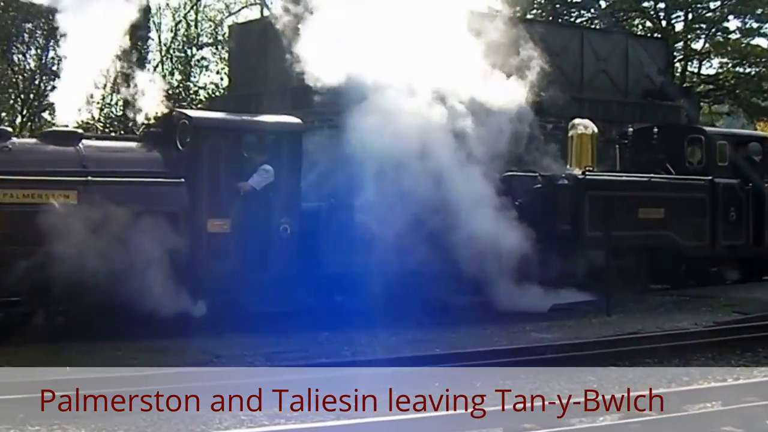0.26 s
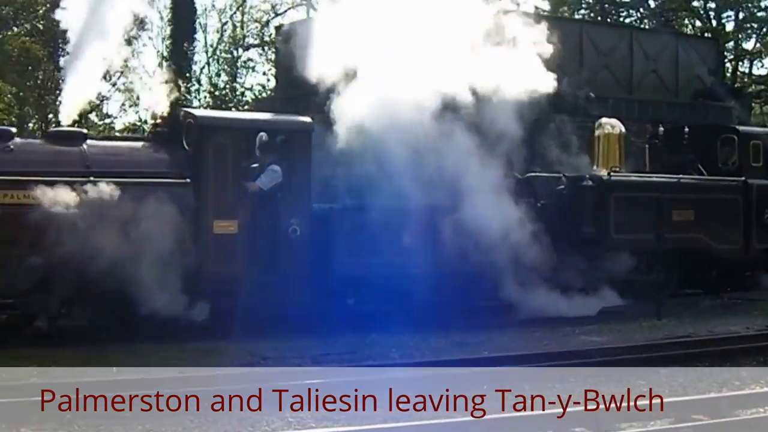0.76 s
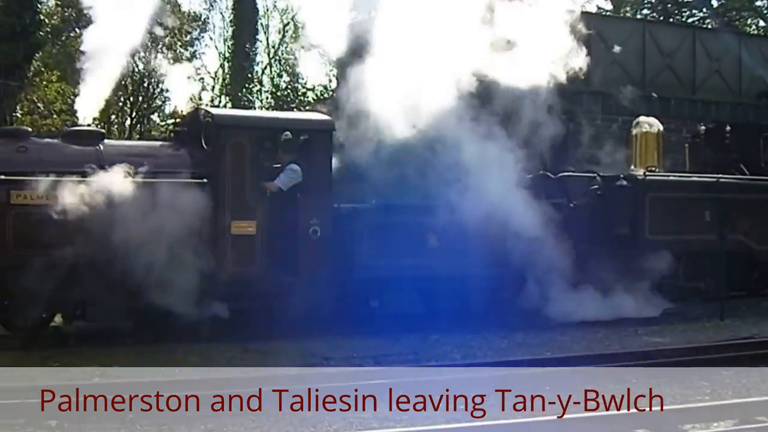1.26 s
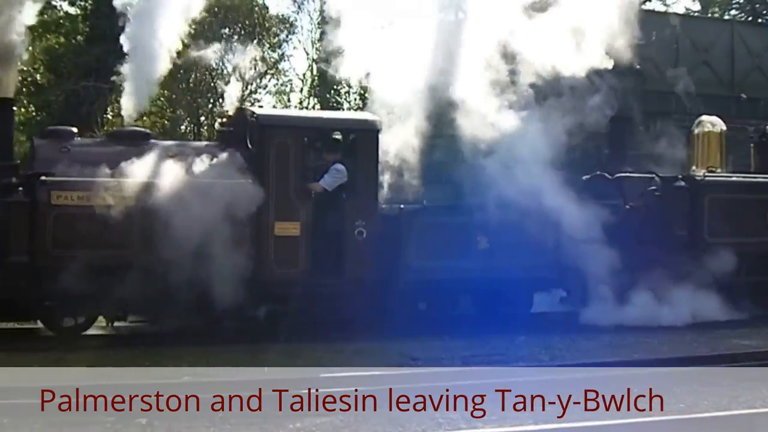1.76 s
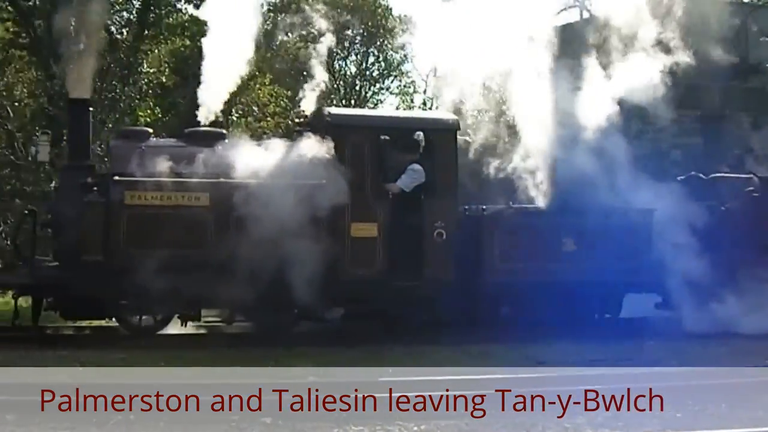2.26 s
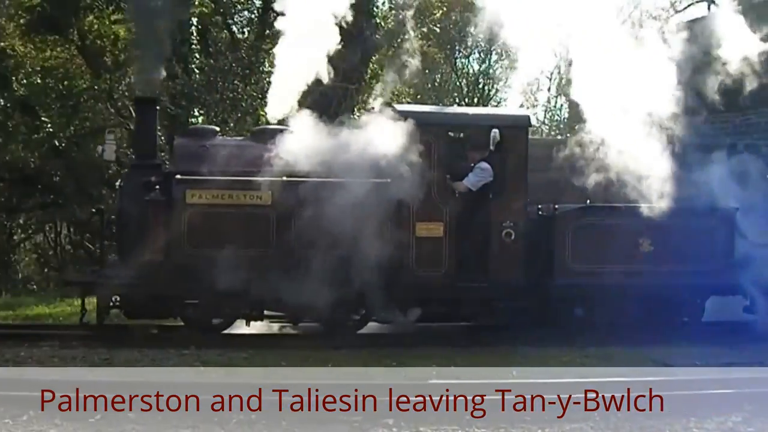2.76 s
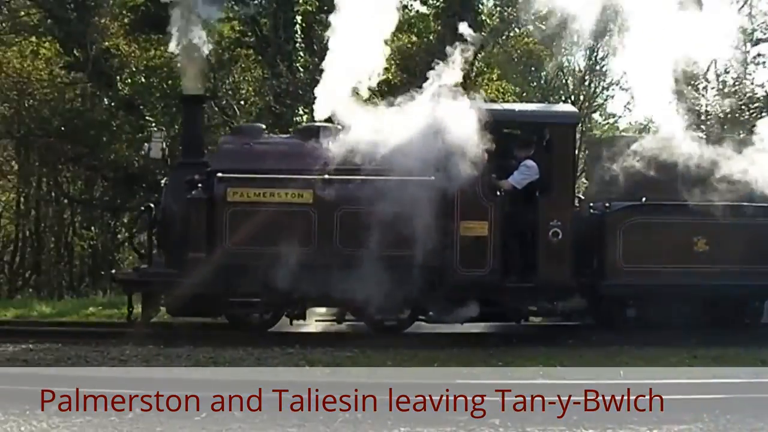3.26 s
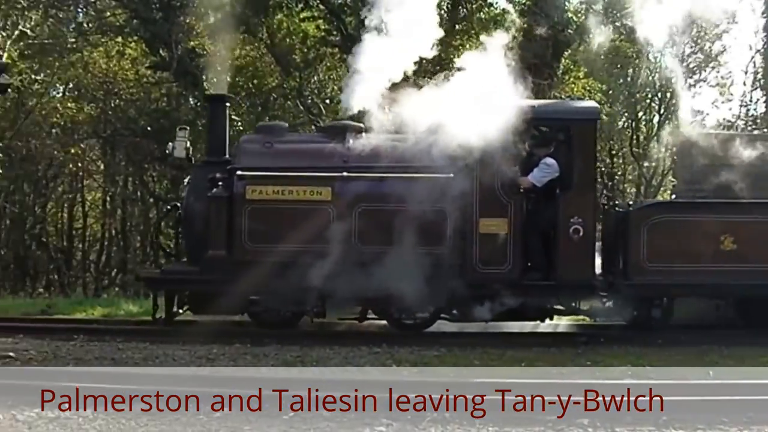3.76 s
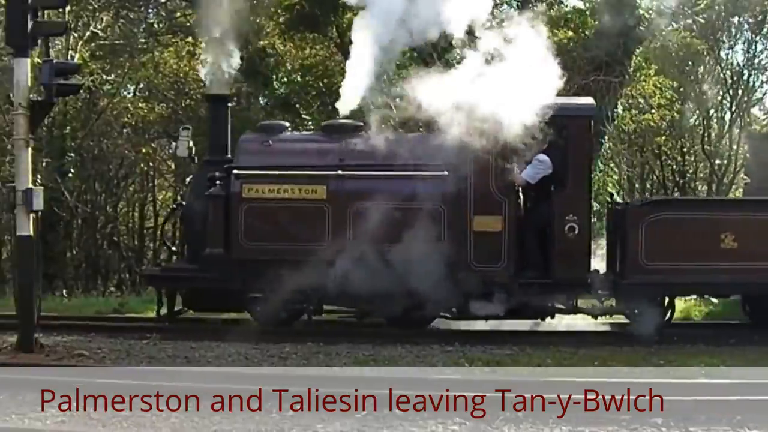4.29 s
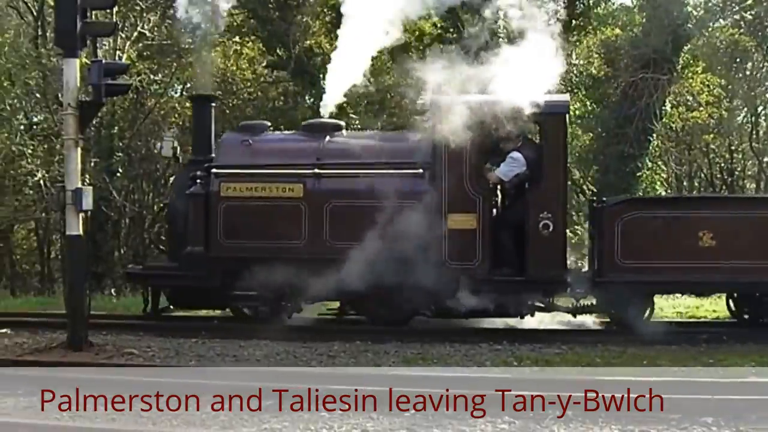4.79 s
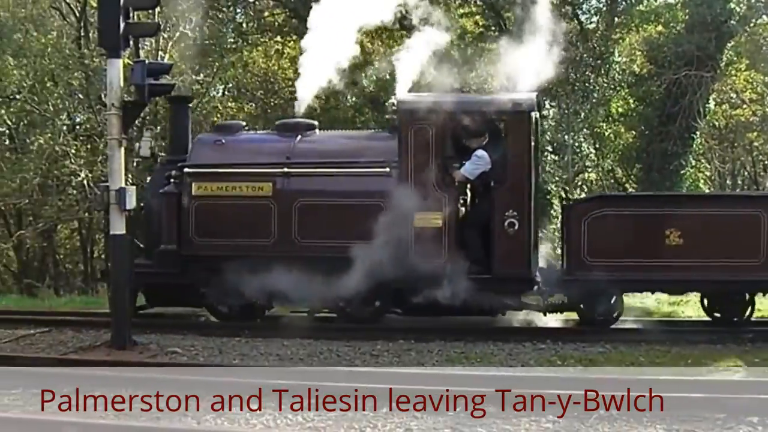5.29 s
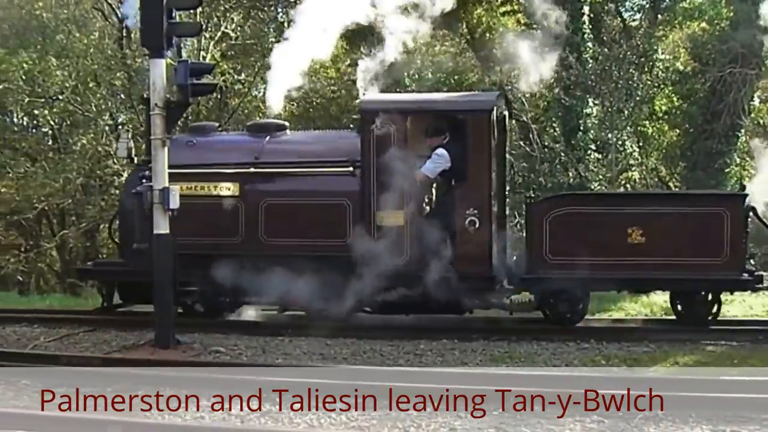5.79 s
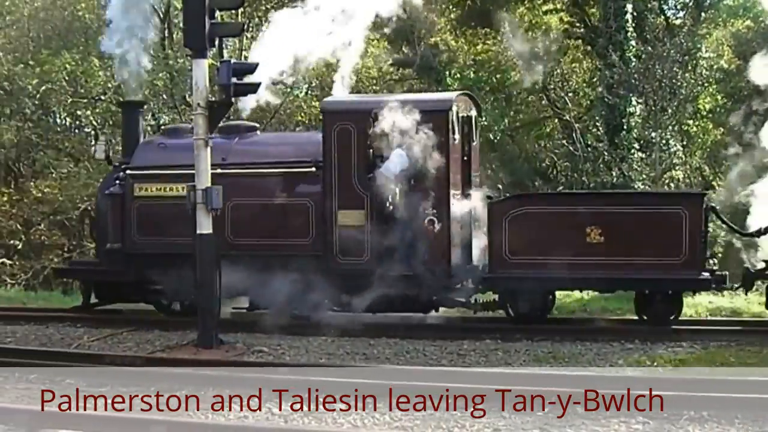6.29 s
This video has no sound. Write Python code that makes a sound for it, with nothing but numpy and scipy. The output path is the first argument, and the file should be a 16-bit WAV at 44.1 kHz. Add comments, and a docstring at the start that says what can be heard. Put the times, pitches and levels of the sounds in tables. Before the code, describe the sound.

Two steam locomotives start a train in open air, heard close from the trackside. Steam hiss dominates throughout, a wet rush mixed with a dry, bright edge. It swells at about 0.7 seconds and is loudest from 1.2 to 2.1 seconds. Beneath it, a few hollow chuffs turn into a quick, raspy flurry of wheel slip between 1.3 and 2.2 seconds. The sound then drops, with several tiny squirts of water around 2.3 to 2.7 seconds and others scattered throughout. From 3 seconds the hiss returns in softer, repeated gusts, while the chuffs of both engines, about three a second and often doubled, gradually strengthen. A thin, very high jet sizzles from 5 seconds and cuts off at 5.5. Light metallic knocks come at about 0.5, 3.4 and 6.1 seconds. A faint, low wheel rumble grows toward the end at 6.5 seconds.

```python
"""Steam hisses from the open cylinder cocks of two narrow-gauge locomotives starting a train:
rear engine first, then the leading one. Each blow is a wet rush plus a dry hiss, combed by short
echoes; slugs of condensed water spit, and a thin jet sings once. Exhaust beats of both engines
ring the chimneys, with one quick flurry of wheel slip. Rods knock over a low wheel rumble."""
import sys
import numpy as np
from scipy import signal
from scipy.fft import rfft, irfft
from scipy.io import wavfile
from scipy.ndimage import uniform_filter1d, map_coordinates

SR = 44100
rng = np.random.default_rng(int(sys.argv[2]) if len(sys.argv) > 2 else 0)


def wav_record(signal):
    """Record a signal, one row per channel, as 16-bit PCM in the file named by sys.argv[1]."""
    frames = np.transpose(np.atleast_2d(signal))
    bounded = np.clip(frames, -1, 1)
    # unit amplitude maps onto the largest positive 16-bit level
    quanta = np.round(bounded * 32767).astype(np.int16)
    wavfile.write(sys.argv[1], SR, quanta)


N = 288414

# chimney draught and rolling train: t/s, draught level/dB, rumble level/dB
BED_LEVELS = [(0, -40.5, -55.5), (1.1, -40.5, -54.5), (1.3, -46, -55.5), (2, -46, -48.5), (2.3, -52.5, -63),
              (3.2, -50.5, -60.5), (4.6, -53.5, -53), (5.5, -52.5, -50), (6.5, -53.5, -45.5)]
# wheels on rails: f/Hz, level/dB
RUMBLE_SPECTRUM = [(15, -25), (45, -9), (90, 3), (130, -3), (220, -6), (300, -15), (600, -15),
                   (1300, -15.5), (4000, -45)]
# knocks of rods and couplings: t/s, level/dB
ROD_KNOCKS = [(0.528, -27.5), (3.384, -36), (6.13, -30)]
# ringing steel: f/Hz, level/dB, t60/s
STEEL_MODES = [(1830, -0.5, 0.13), (1900, -3.5, 0.11), (2040, -5, 0.099), (2800, -9, .07), (3460, -11, .05)]
# exhaust beats of both engines, in and out of step: t/s, level/dB
EXHAUST_BEATS = [(0.025, -38.5), (0.355, -32.5), (0.834, -32), (1.078, -37.5), (1.288, -29), (1.441, -29),
                 (1.569, -29), (1.676, -29.5), (1.788, -30.5), (1.892, -30), (2.02, -35.5), (2.163, -37),
                 (2.335, -44.5), (2.39, -43.5), (2.831, -42), (2.892, -40), (3.251, -38.5), (3.39, -38),
                 (3.603, -36.5), (3.895, -38.5), (4.008, -36), (4.331, -34), (4.372, -33), (4.72, -34.5),
                 (4.79, -34), (5.039, -34.5), (5.195, -35.5), (5.397, -35), (5.628, -33.5), (5.718, -30),
                 (6.001, -31.5), (6.04, -32.5), (6.305, -32), (6.384, -31)]
# chimney resonances, and the rear one under its blower: f/Hz, width/Hz, level/dB
REAR_CHIMNEY_MODES = [(159, 61, -6.5), (405, 51, 1), (665, 62, 1), (1034, 26, -3)]
LEAD_CHIMNEY_MODES = [(178, 102, -7), (405, 47, 2), (671, 140, -2.5), (1030, 160, -9), (1200, 50, -10)]
BLOWER_MODES = [(170, 79, -10), (414, 60, -0.5), (662, 125, 0), (1680, 200, -2)]
# blast pipe turbulence: f/Hz, level/dB
RASP_SPECTRUM = [(60, -13), (250, -9), (400, -24), (750, -2.5), (900, -6), (1150, -1.5), (1380, -5.5),
                 (1600, 3), (2300, 0.5), (3500, -3.5), (6000, -9.5), (14000, -32)]
# water spat from the cocks: t/s, length/s, f/Hz, level/dB
WATER_SLUGS = [(.175, .05, 3100, -33), (1.06, .09, 4600, -33), (2.308, .035, 4100, -30),
               (2.382, .043, 4250, -30), (2.487, .035, 3850, -35), (2.55, .03, 3950, -36),
               (2.7, .06, 6300, -35), (3.71, .08, 4800, -34), (4.36, .08, 3800, -36),
               (4.59, .06, 2850, -33), (5.485, .055, 4620, -31), (6.01, .03, 3000, -29),
               (6.265, .07, 3200, -30.5)]
# a cock blows while its cylinder end holds steam: t/s, length/s, rush level/dB, hiss level/dB
COCK_BLOWS = [(-0.05, .72, -29.5, -32), (0.02, 0.047, -41.5, -31), (0.385, .06, -46, -31.5),
              (0.663, 0.51, -24.5, -26.5), (1.169, 0.44, -27.5, -19.3), (1.604, .51, -26, -21.5),
              (2.137, 0.075, -32.5, -36), (2.29, .12, -35.5, -39), (2.45, 0.46, -38, -46.5),
              (2.683, 0.07, -31.5, -43), (3.09, 0.74, -35, -37), (3.57, .24, -32.5, -38),
              (3.852, 0.46, -35.5, -41), (4.024, .23, -33.5, -44), (4.313, 0.17, -33.5, -38.5),
              (4.512, .33, -33.5, -38), (4.923, 0.6, -30.5, -34), (5.372, .15, -30, -36),
              (5.57, .87, -31, -36.5), (5.974, 0.38, -33, -38.5), (6.499, .06, -28.5, -32)]
# wet rush of each engine, dry high-pressure hiss of both: f/Hz, level/dB
REAR_RUSH_SPECTRUM = [(300, -49), (1150, -20.5), (1450, -13.5), (1700, -11), (2200, -10), (2700, -7.5),
                      (3600, -10), (4600, -3.5), (5200, -3), (6200, 3.5), (7200, -2), (8700, -2),
                      (9800, -15), (16000, -10)]
LEAD_RUSH_SPECTRUM = [(300, -63), (1400, -19), (1700, -11.5), (2300, -8.5), (2650, -2.5), (3100, -4.5),
                      (3400, -5.5), (5000, -2.5), (6150, 5.5), (7200, 0.5), (8600, 3), (9600, -5),
                      (16000, -29)]
HISS_SPECTRUM = [(500, -62), (2000, -23), (5000, -6), (8500, 1), (9600, 0.5), (11200, 2), (12000, 1.5),
                 (12700, 1.5), (15600, -3.5), (17000, -40)]
# jets lie nearer the right, which takes more treble: f/Hz, left minus right/dB
JET_TILT = [(1000, 3.5), (2300, -1.5), (3300, 4.5), (4500, 2), (6000, -3), (7200, -4.5), (9000, -3),
            (11500, -8), (15000, -3.5)]
# jets swing as the engines pass: t/s, left minus right/dB
JET_PAN = [(.45, 2.3), (.8, 0), (3.5, -0.5), (5.3, 0.7)]
# echoes off ground, frames and tank side: delay/ms, drift/ms, relative level/dB
JET_PATHS = [(1.08, 0.039, -4), (2.8, .2, 3), (6, 0.099, 1)]

HANDOVER_S = 2.25  # the leading engine becomes the nearer one
SLIP_START_S, SLIP_END_S = 1.25, 2.2
BEAT_OPEN_S, SLIP_OPEN_S, SLIP_RASP_DB = 0.061, 0.05, 3
COCK_RISE_S, COCK_FALL_S = 0.036, 0.038
LEAK_RUSH_DB, LEAK_HISS_DB, SURGE_DB = -35.5, -41.5, 0.9
NOTCH_HZ, LOWPASS_HZ = 7900, 15650


def undb(db):
    """Decibels to gain."""
    return 10 ** (np.asarray(db) / 20)


def unit(x):
    """Scale to rms 1 at the stereo centre."""
    return x / np.sqrt(np.mean(np.atleast_2d(x).mean(axis=0) ** 2))


def times():
    """Sample times in s."""
    return np.arange(N) / SR


def freqs():
    """Bin frequencies in Hz, floored at 1."""
    return np.maximum(np.arange(N // 2 + 1) * SR / N, 1)


def curves(table):
    """Table columns, linearly interpolated in time."""
    t_s, *columns = np.transpose(table)
    return [np.interp(times(), t_s, column) for column in columns]


def colour(spectrum):
    """Gain per bin from f/Hz, level/dB points."""
    hz, db = np.transpose(spectrum)
    return undb(np.interp(np.log(freqs()), np.log(hz), db))


def resonance(hz, width_hz):
    """One resonance, gain 1 at its centre."""
    f = freqs()
    return 1 / (1 + 1j * (f * f - hz * hz) / (f * width_hz))


def walk(rate_hz):
    """Random steps, smoothed twice; rms 1."""
    hold = max(int(SR / rate_hz), 1)
    steps = rng.standard_normal(N)[np.arange(N) // hold]
    return unit(uniform_filter1d(uniform_filter1d(steps, hold), hold))


def puff(start_s, length_s, rise_s, fall_s):
    """Valve envelope: pressure builds, holds, drains."""
    age_s = times() - start_s
    return np.clip(age_s / rise_s, 0, 1) * np.exp(-np.maximum(age_s - length_s, 0) / fall_s)


def turbulence(response, diffuse_db, left_gain=1, lag_us=0):
    """Coloured stereo noise: a direct wave, lagging on the left, plus scattered sound."""
    direct, *scattered = rfft(rng.standard_normal((3, N)))
    delay = np.exp(-2j * np.pi * freqs() * lag_us / 10 ** 6)
    channels = np.array([left_gain * delay, np.ones_like(delay)])
    field = direct + undb(diffuse_db) * np.array(scattered)
    return unit(irfft(response * channels * field, N))


def eddies(x, depth_db, width_hz, life_s, fft_size):
    """Passing eddies favour one narrow band, then another."""
    hz, t_s, spectrum = signal.stft(x, SR, nperseg=fft_size)
    cells = np.meshgrid(hz / width_hz, t_s / life_s, indexing="ij")
    swell = map_coordinates(rng.standard_normal((400, 400)), cells, order=1, mode="wrap")
    _, swirled = signal.istft(spectrum * undb(depth_db * swell), SR)
    return unit(swirled[:, :N])


def reflected(x, paths):
    """Add echoes (delay/ms, level/dB); drifting delays make a sliding comb."""
    t = times()
    echoes = sum(undb(db) * np.array([np.interp(t - ms / 1000, t, side) for side in x])
                 for ms, db in paths)
    return unit(x + echoes)


def wheels():
    """Uneven rumble of wheels on rails."""
    _, rumble_db = curves(BED_LEVELS)
    uneven_db = 1.5 * walk(rate_hz=12)
    rumble = turbulence(colour(RUMBLE_SPECTRUM), diffuse_db=-10, left_gain=undb(1.5))
    return rumble * undb(rumble_db + uneven_db)


def knocks():
    """Slack in the running gear closes; the steel rings briefly."""
    out = np.zeros(N)
    for start_s, db in ROD_KNOCKS:
        age_s = np.maximum(times() - start_s, 0)
        for hz, mode_db, t60_s in STEEL_MODES:
            decay = np.exp(-np.log(1000) * age_s / t60_s)
            out += undb(db + mode_db - 2.5) * np.sin(2 * np.pi * hz * age_s) * decay
    return out


def chimney(modes):
    """Blast noise rings a chimney; the open pipe radiates little deep bass."""
    power = sum(abs(undb(db) * resonance(hz, width_hz)) ** 2 for hz, width_hz, db in modes)
    radiation = abs(resonance(hz=330, width_hz=1850))
    pipe = turbulence(np.sqrt(power) * radiation, diffuse_db=-13.5, left_gain=undb(2.5))
    return eddies(pipe, depth_db=2.5, width_hz=112.2, life_s=0.12, fft_size=1024)


def beat_envelopes():
    """Chimney tone and rasp per valve opening; shorter and raspier during wheel slip."""
    tone_power, rasp_power = np.zeros((2, N))
    for start_s, db in EXHAUST_BEATS:
        slipping = SLIP_START_S < start_s < SLIP_END_S
        open_s, rasp_db = (SLIP_OPEN_S, SLIP_RASP_DB) if slipping else (BEAT_OPEN_S, 0)
        tone_power += (undb(db) * puff(start_s, open_s, rise_s=0.036, fall_s=0.031)) ** 2
        rasp_power += (undb(db + rasp_db) * puff(start_s, open_s, rise_s=0.026, fall_s=0.033)) ** 2
    return np.sqrt(tone_power), np.sqrt(rasp_power)


def exhaust():
    """Puffs of chimney tone and blast pipe rasp over a weak draught."""
    tone_env, rasp_env = beat_envelopes()
    draught_db, _ = curves(BED_LEVELS)
    rear_nearer = times() < HANDOVER_S
    tone = np.where(rear_nearer, chimney(REAR_CHIMNEY_MODES), chimney(LEAD_CHIMNEY_MODES))
    draught = np.where(rear_nearer, chimney(BLOWER_MODES), tone)
    rasp = turbulence(colour(RASP_SPECTRUM), diffuse_db=-19, left_gain=undb(2))
    rasp = eddies(rasp, depth_db=4.5, width_hz=121.3, life_s=0.15, fft_size=1024)
    blast = undb(-0.9) * tone_env * tone + undb(-0.83) * rasp_env * rasp
    return blast * undb(0.63 * walk(rate_hz=130)) + undb(draught_db) * draught


def spits():
    """Water narrows a jet to a brief, semi-tonal squirt that rises as the slug clears."""
    out = np.zeros((2, N))
    flutter = turbulence(resonance(hz=130, width_hz=300) ** 2, diffuse_db=-7, left_gain=undb(2))
    lag_rad = np.array([[1.2], [0]])
    for start_s, length_s, hz, db in WATER_SLUGS:
        progress = (times() - start_s) / length_s
        pitch_hz = hz * (1 + 0.035 * np.clip(progress - 0.7, -1, 1))
        phase_rad = 2 * np.pi * np.cumsum(pitch_hz) / SR - lag_rad
        envelope = undb(db) * puff(start_s, length_s, rise_s=0.016, fall_s=0.012)
        out += envelope * flutter * np.sqrt(2) * np.sin(phase_rad)
    return out


def thin_jet():
    """Steam sings through a narrow gap and stops dead as the valve covers it."""
    band = resonance(hz=11000, width_hz=2500) ** 2
    sizzle = turbulence(band, diffuse_db=-1, left_gain=undb(-15), lag_us=50)
    opening = puff(start_s=4.95, length_s=0.59, rise_s=0.1, fall_s=0.008)
    return undb(-33.5) * opening * sizzle


def cock_envelopes():
    """Rush and hiss: blows add to a steady leak; the hiss surges on each exhaust beat."""
    rush_power, hiss_power = undb(LEAK_RUSH_DB) ** 2, undb(LEAK_HISS_DB) ** 2
    for start_s, length_s, rush_db, hiss_db in COCK_BLOWS:
        opening = puff(start_s, length_s, COCK_RISE_S, COCK_FALL_S)
        rush_power += (undb(rush_db) * opening) ** 2
        hiss_power += (undb(hiss_db) * opening) ** 2
    beats = [puff(start_s, BEAT_OPEN_S, COCK_RISE_S, COCK_FALL_S) for start_s, _ in EXHAUST_BEATS]
    surge = undb(SURGE_DB * np.max(beats, axis=0))
    return np.sqrt(rush_power), np.sqrt(hiss_power) * surge


def jet(envelopes, rush_spectrum, rush_lag_us, hiss_lag_us, rush_db, hiss_db, diffuse_db, echo_db):
    """One engine's cock steam: wet rush and dry hiss, mirrored by ground and moving steel."""
    rush_env, hiss_env = envelopes
    left_gain = colour(JET_TILT)
    paths = [(ms + drift_ms * walk(rate_hz=0.99), echo_db + db) for ms, drift_ms, db in JET_PATHS]
    rush = turbulence(colour(rush_spectrum), diffuse_db, left_gain, rush_lag_us)
    rush = eddies(reflected(rush, paths), depth_db=2.4, width_hz=240, life_s=0.07, fft_size=512)
    hiss = turbulence(colour(HISS_SPECTRUM), diffuse_db=-3.3, left_gain=left_gain, lag_us=hiss_lag_us)
    hiss = hiss_env * reflected(hiss, paths) * undb(hiss_db)
    # droplets break the jet: flutter
    rush *= rush_env * undb(rush_db + 0.61 * walk(rate_hz=60))
    return (rush + hiss) * undb(0.71 * walk(rate_hz=500))


def cocks():
    """Open cylinder cocks: equal-power fade from the rear engine to the leading one."""
    envelopes = cock_envelopes()
    rear = jet(envelopes, REAR_RUSH_SPECTRUM, rush_lag_us=29.3, hiss_lag_us=5.8,
               rush_db=-0.37, hiss_db=0.75, diffuse_db=-6, echo_db=-21)
    lead = jet(envelopes, LEAD_RUSH_SPECTRUM, rush_lag_us=45.8, hiss_lag_us=55.7,
               rush_db=0, hiss_db=2.5, diffuse_db=-8, echo_db=-15)
    fade_rad = np.clip((times() - HANDOVER_S) / 0.13 + 0.5, 0, 1) * np.pi / 2
    pan_db, = curves(JET_PAN)
    pan = undb(np.array([pan_db, -pan_db]) / 2)
    return (np.cos(fade_rad) * rear + np.sin(fade_rad) * lead) * pan


def scene():
    """Both engines and their train, in open air."""
    return exhaust() + cocks() + thin_jet() + spits() + knocks() + wheels()


def record(dry):
    """Narrow treble notch, then a steep low-pass."""
    notch = (1 - resonance(NOTCH_HZ, width_hz=306)) ** 2
    lowpass = signal.ellip(10, 0.1, 80, LOWPASS_HZ, fs=SR, output="sos")
    return signal.sosfilt(lowpass, irfft(rfft(dry) * notch, N))


dry = scene()
out = record(dry)
wav_record(out)
```